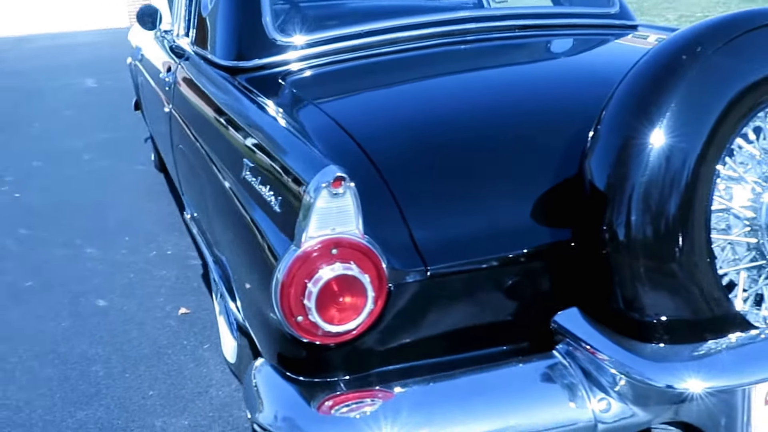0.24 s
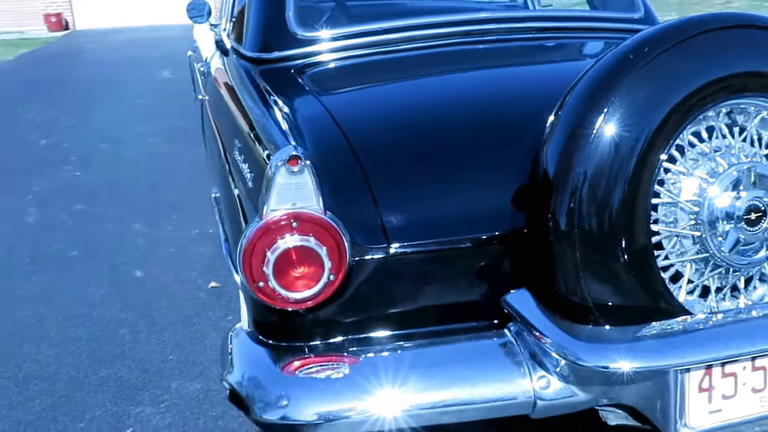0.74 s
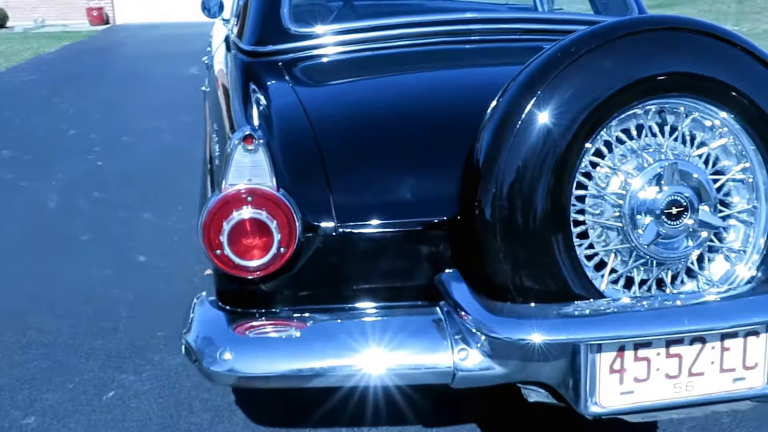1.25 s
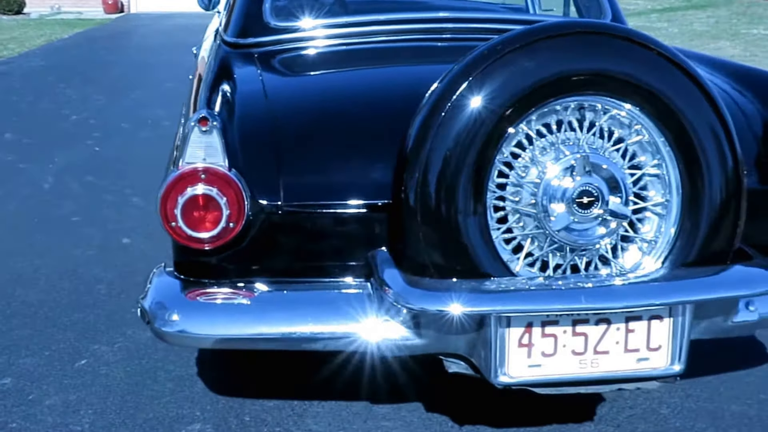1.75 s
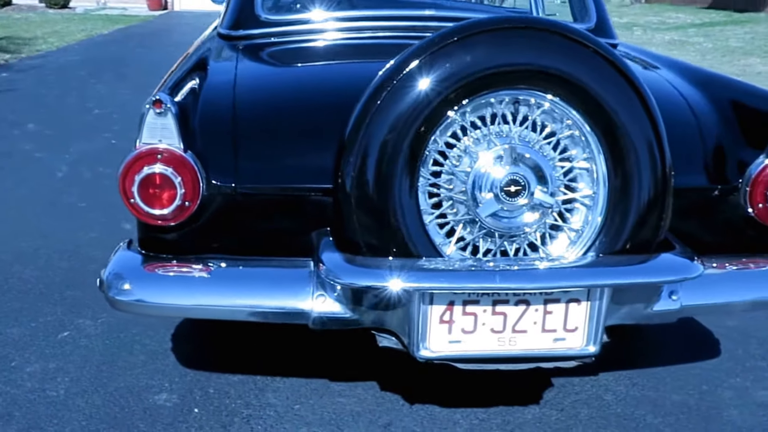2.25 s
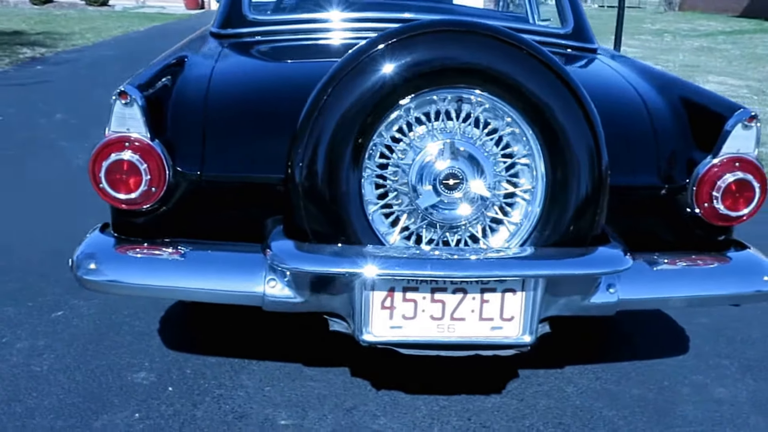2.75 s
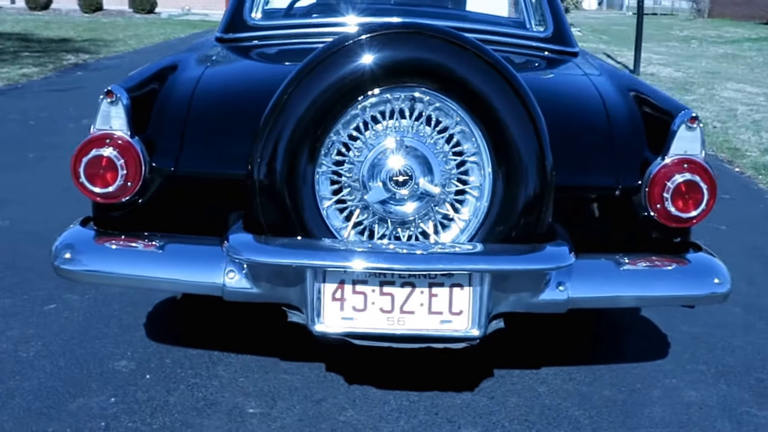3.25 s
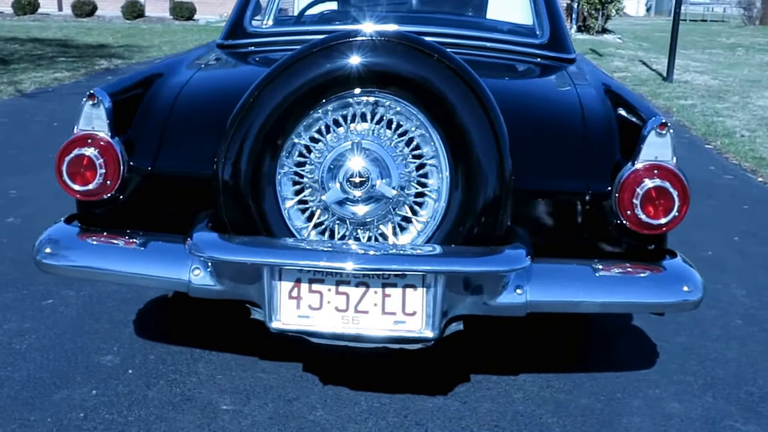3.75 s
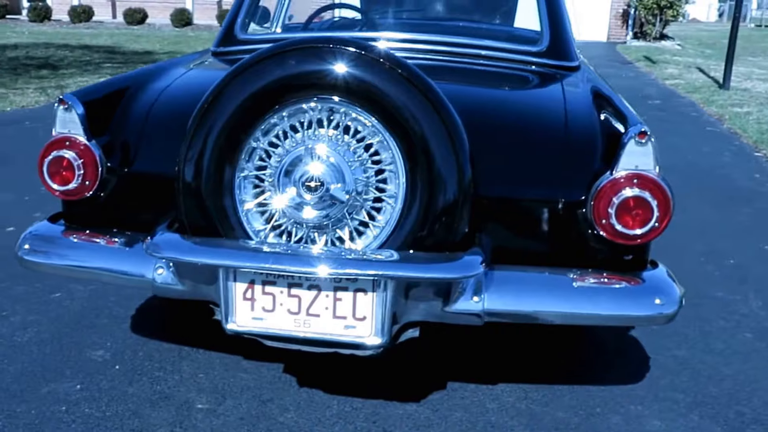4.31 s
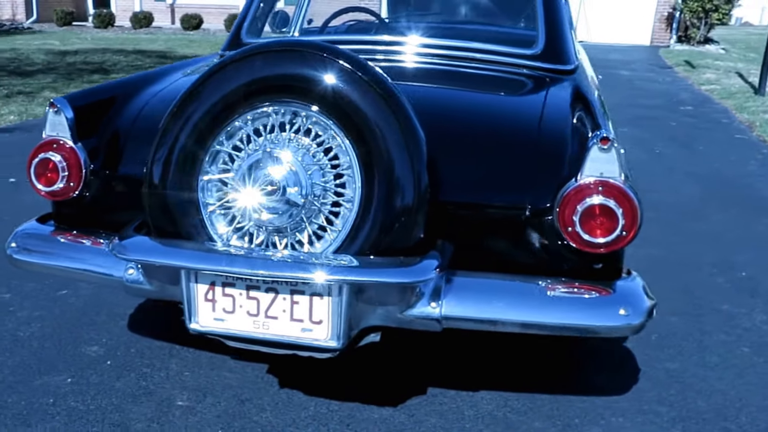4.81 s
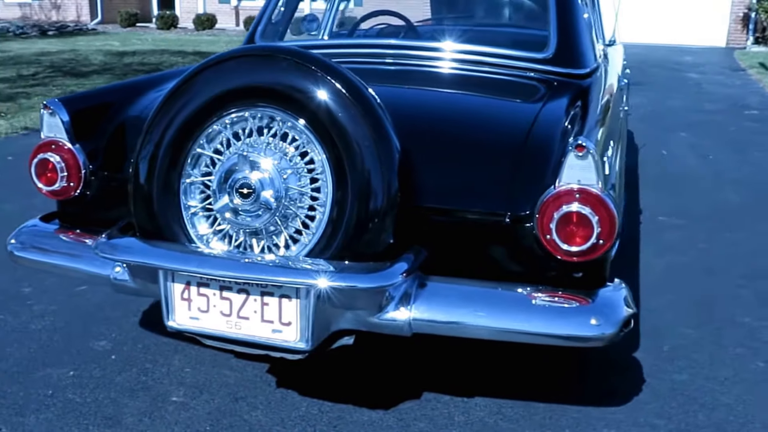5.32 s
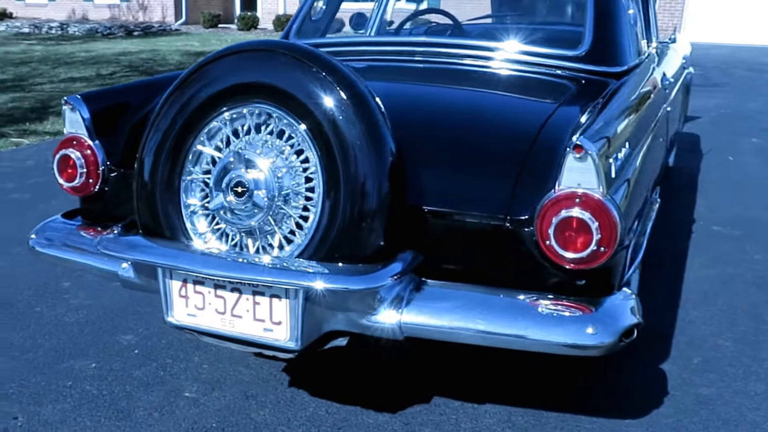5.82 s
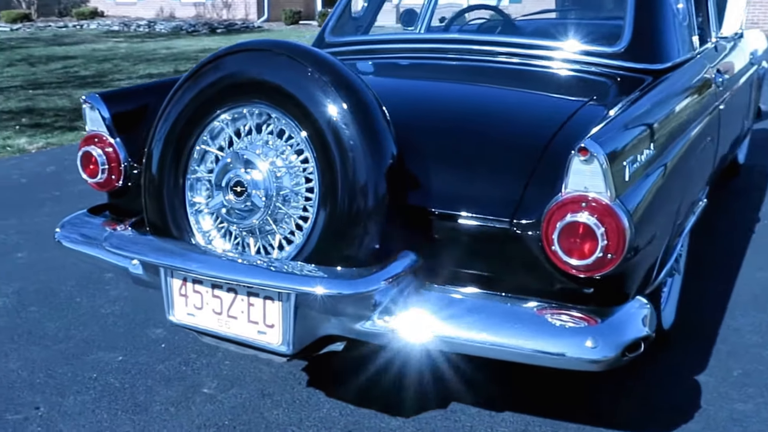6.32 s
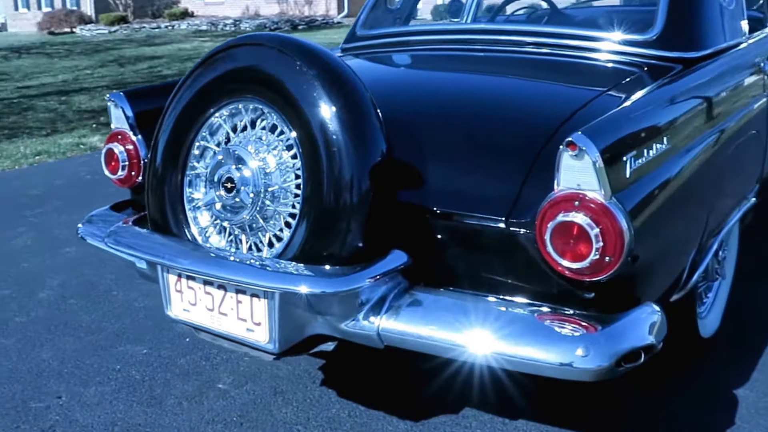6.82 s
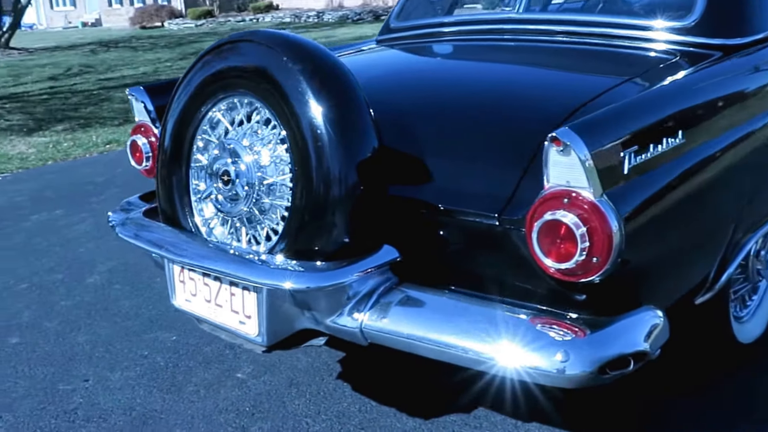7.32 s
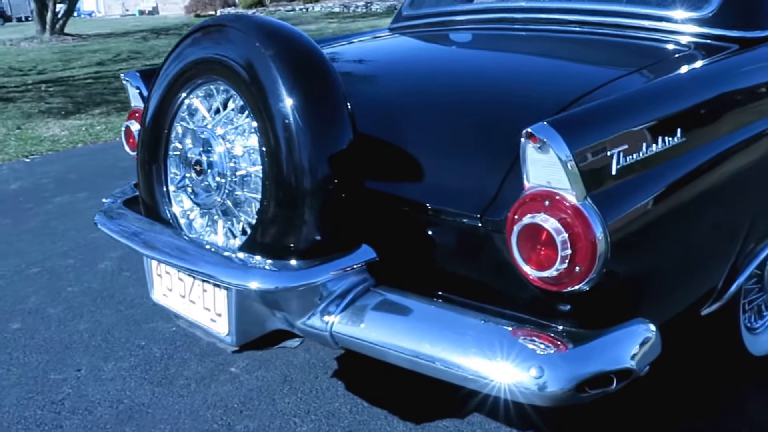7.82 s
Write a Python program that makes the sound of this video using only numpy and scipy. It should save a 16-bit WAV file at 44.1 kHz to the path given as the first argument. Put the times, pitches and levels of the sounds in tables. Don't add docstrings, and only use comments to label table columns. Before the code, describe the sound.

An old eight-cylinder car idles throughout at unchanged slow speed, about 68 firings a second, outdoors on asphalt, heard by a close handheld stereo camera. From 0 to 2 s the left pipe gives a deep uneven burble, with breathy fan roar, a faint high intake whistle and small valve ticks. Around 2.5 to 4.5 s, behind the middle, the burble smooths into an even low hum with an octave above it and thin belt whines. Soft wind flutters from 3.5 s, strengthening near 4.9 s into heavy bass buffets, strongest about 5.3 to 5.5 s. The automatic gain ducks and bass thins, recovering by about 6.4 s as gusts fade. From 6 to 8 s the right pipe burbles with a rough lope; the engine bay sounds closer, hissier and slightly louder, with scattered sharp metallic ticks. The idle continues to the end.

```python
import sys
import numpy as np
from scipy import signal
from scipy.fft import rfft, irfft, next_fast_len
from scipy.io import wavfile
from scipy.ndimage import uniform_filter1d, map_coordinates

SR = 44100
rng = np.random.default_rng(int(sys.argv[2]) if len(sys.argv) > 2 else 0)


def wav_record(signal):
    frames = np.transpose(np.atleast_2d(signal))
    bounded = np.clip(frames, -1, 1)
    quanta = np.round(bounded * 32767).astype(np.int16)
    wavfile.write(sys.argv[1], SR, quanta)


def undo_db(level):
    steps = np.asarray(level, float) / 20
    return 10 ** steps


N = 355446

# time in seconds, place on the arc (left corner -1, centre 0, right corner +1).
WALK = [(0, -0.76), (1.4, -0.68), (1.75, -0.42), (2.7, -0.35), (3.9, 0.2), (4.85, 0.38), (5.42, .4),
        (5.65, 0.74), (6.4, 0.8), (8.06, 0.79)]
# time in seconds, gain in dB.
CLOSE = [(0, 1), (.2, -1), (1.2, 1), (1.75, -0.5), (2.15, 1.5), (2.5, 0.5), (3.05, 2.5), (3.55, 2),
         (4.0, -1.5), (4.6, -1.5), (5.3, -2), (6.0, 0), (6.6, 3.5), (7.3, 4), (8.06, 4.5)]
# time in seconds, share of the side view from 0 to 1.
TURN = [(0, 0), (5.0, 0), (6.4, 1), (8.06, 1)]
# time in seconds, balance (left pipe +1, right pipe -1).
NEARER = [(0, .72), (2.9, .75), (3.4, .1), (4.6, -.05), (5.6, -.93), (6.5, -.81), (8.06, -.7)]
# time in seconds, left minus right in dB.
PAN = [(0, 0), (4.8, 0), (5.6, -.6), (6.3, -.5), (6.7, 0), (8.06, 0)]
# time in seconds, samples by which left lags right.
LAG = [(0, -0.9), (2.5, -.3), (4.8, 0.2), (5.6, .8), (6.5, 1.4), (8.06, 1.58)]
# frequency in Hz, side minus mid in dB.
WIDTH = [(60, -40.5), (290, -40), (630, -35), (1380, -14.5), (3030, -18), (6000, -6.5), (9000, -9.5),
         (14500, 2)]

# start in seconds, length in seconds, strength in dB.
GUSTS = [(1.18, 0.059, -46), (1.456, 0.083, -43), (1.68, 0.019, -34), (2.08, 0.17, -45), (2.62, .04, -45),
         (2.753, 0.03, -30.5), (2.8, .09, -36), (3.055, 0.2, -49), (3.549, 0.14, -32), (3.723, 0.14, -37),
         (3.915, 0.33, -29.5), (4.174, 0.022, -24), (4.308, 0.36, -29.5), (4.558, 0.085, -27),
         (4.69, .1, -35.5), (4.787, 0.066, -28), (4.879, 0.14, -20.5), (4.913, 0.0099, -20),
         (5.038, .012, -16), (5.065, 0.098, -22.5), (5.201, 0.029, -21), (5.238, 0.023, -23.5),
         (5.29, 0.025, -22), (5.333, 0.018, -17.5), (5.363, .02, -18), (5.391, .03, -15.5),
         (5.441, 0.02, -11), (5.465, .04, -18), (5.524, 0.16, -29), (5.779, 0.012, -24), (5.811, 0.08, -30),
         (5.977, 0.012, -22.5), (6.015, 0.205, -35), (6.141, .02, -30.5), (6.273, 0.027, -25.5),
         (6.313, 0.043, -35), (6.382, 0.053, -38.5), (6.45, 0.015, -30), (6.496, 0.099, -39),
         (6.732, 0.064, -39), (6.81, 0.057, -48), (6.919, 0.012, -25.5), (6.945, 0.046, -35),
         (7.054, 0.014, -31.5)]
GUST_RISE_S, GUST_FALL_S = 0.0081, 0.022
BREEZE_DB, BREEZE_GROWS_DB_PER_S, CALM_S = -54.5, 3.5, 3.6
# frequency in Hz, level in dB per Hz.
BUFFET = [(15, -44), (30, -30), (60, -16), (110, -5), (200, -1), (300, -5), (430, -7), (520, -15),
          (600, -22), (1000, -36), (2000, -70)]
# time in seconds, level above its rumble in dB.
FLUTTER = [(0, -9.5), (3.9, -15), (4.9, -10.5), (5.15, -6), (5.3, -2), (5.38, -6), (5.6, 3), (8.06, -1)]
# frequency in Hz, level against the opposed part in dB.
SHARED = [(100, 5), (250, 1), (430, -3), (600, -11)]

# frequency in Hz, level in dB per Hz.
FAN = [(650, -3), (1100, -8), (1560, -2), (1780, -2), (2050, -2), (2980, -3.5), (3920, -10), (4940, -12.5),
       (8000, -27.5), (10400, -53), (17600, -120)]
# frequency in Hz, level in dB per Hz.
BODY = [(160, 0.5), (270, -4.5), (295, -2), (403, -11), (498, 0), (723, -9.5), (933, -6.5), (1060, -11.5),
        (1400, -16.5), (1820, -75), (3080, -120)]
# frequency in Hz, level in dB per Hz.
HISS = [(3800, -31), (6500, -2), (8500, -5), (9700, -4), (10600, -9), (12100, -12), (13200, -10),
        (15000, -19)]
# frequency in Hz, width in Hz, level in dB.
PANELS = [(436, 1.7, -12), (500, 6, -18.5), (933, 72, -3), (1134, 4.9, -6.5), (1759, 35, 1.5)]
# frequency in Hz, width in Hz, level in dB.
FLANK = [(530.4, 7.5, 3), (994, 49, 2), (1818, 36, 2.5), (2290, 57, -20), (2960, 28, 2.5)]
ROAR_DB, BODY_DB, BODY_FLANK_DB, HISS_DB, HISS_FLANK_DB = -42, 12.5, -1, -17.5, 6.5
PATCHY_DB, FLANK_TOP_HZ = 1.7, 11000
DIRECT_DB = -9

# time in seconds, pitch in Hz, level in dB.
WHISTLE = [(0, 9070, -66), (.8, 9150, -68), (1.7, 9500, -78), (2.3, 9500, -76), (2.7, 9760, -71),
           (3.8, 9930, -65), (4.6, 9500, -69), (5.4, 9530, -78), (8.06, 9350, -77)]
WHISTLE_WIDTH_HZ = 180
# pitch in Hz, start in
# seconds, end in seconds, level in dB, left minus right in dB.
WHINES = [(323, 2.8, 4.7, -39, 0), (447, 1.9, 4, -42.5, 4), (488, -.3, 5, -40.5, 0), (235, 1.6, 3, -56, 18),
          (447, 1, 1.6, -49, 4), (914, 2, 2.9, -35.5, 0), (1144, .8, 3.6, -53, 0),
          (4470, 4.3, 5.7, -62, -2), (403, 3.2, 4.7, -45, 0), (406, .2, 1.2, -47, 0),
          (327, .2, 1.6, -46, 0), (914, 1.5, 2.1, -46, 0), (5700, 4.3, 6.3, -65, 0)]
# pitch in Hz, 60 dB decay in seconds, place in the engine cycle from 0 to 1,
# start in seconds, end in seconds, level in dB.
TAPPETS = [(13050, .015, .36, 0, 5.8, -55), (5750, .04, .04, 2.8, 7.2, -53),
           (4850, .04, .59, 7.3, 8.1, -50), (2950, .025, .85, 6.8, 6.7, -44),
           (4600, .03, .55, 2.5, 8.1, -58), (2900, .02, .7, 0, 5, -50), (2900, .02, .35, 5, 8.1, -48),
           (9700, .01, .55, .5, 5, -62), (7500, .01, .02, 0, 8.1, -61)]
# time in seconds, pitch in Hz, 60 dB decay in seconds, level in dB.
TICKS = [(4.91, 90, .06, -11), (5.292, 110, 0.079, -13), (5.372, 85, .09, -9.5), (5.435, 100, .07, -11),
         (6.285, 140, .06, -10), (2.745, 940, .03, -29), (5.733, 5800, .04, -50), (5.85, 5700, .04, -51),
         (5.968, 5800, .04, -44), (6.015, 4800, .04, -47), (6.832, 3300, .03, -36), (6.74, 2880, .03, -45),
         (6.91, 2940, .03, -36), (7.424, 1820, .05, -35), (7.763, 5000, .04, -39),
         (7.775, 3300, 0.027, -42), (7.881, 4900, .04, -39.5)]

# time in seconds, firings per second in Hz.
SPEED = [(0.0, 68.69), (0.75, 68.53), (1.22, 69.39), (1.75, 68.28), (2.5, 68.2), (2.88, 69.62),
         (3.3, 68.65), (4.2, 67.94), (4.5, 68.44), (5.25, 68.29), (5.5, 67.68), (5.8, 68.55), (6.3, 67.9),
         (6.88, 69.19), (7.5, 68.46), (8.06, 69.14)]
BANKS = [1, 1, -1, 1, -1, -1, 1, -1]
CYLINDERS = [-.2, .15, .45, -.1, -.5, -.1, .3, .15]
# frequency in Hz, level in dB.
LEFT_PIPE = [(15, -45), (30, -27), (43, -9), (60, -2), (77, -5), (94, 2), (112, -1), (129, 0), (146, -8),
             (154, -16), (163, -7), (185, -19), (230, -50)]
# frequency in Hz, level in dB.
MIDDLE_PIPE = [(15, -45), (30, -29), (43, -14), (60, 0), (77, -5), (86, 0), (94, -3), (112, -2), (120, 2),
               (129, -1), (146, -7), (154, -13), (163, -6), (185, -19), (230, -50)]
# frequency in Hz, level in dB.
RIGHT_PIPE = [(15, -50), (30, -30), (43, -14), (60, -8), (77, -9), (94, 2), (112, -7), (129, -1), (146, -9),
              (165, -15), (185, -18), (230, -50)]
# frequency in Hz, level in dB.
RASP = [(140, -6.5), (154, -12.5), (165, -7), (180, -1), (191, -9), (205, -0.5), (220, 3), (236, 10.5),
        (254, 2.5), (285, -22.5), (400, -8.5), (700, -64)]
TONE_DB, TONE_LEFT_DB, TONE_FLANK_DB = -15.5, -1.5, -3.5
PIPES_FOLLOW, RASP_FOLLOWS = 0.23, 0.17
OCTAVE_DB, OCTAVE_OFF_DB, OCTAVE_BEAM = -19, -23, 2.57
THIRD_DB, THIRD_OFF_DB = -37.5, -8.5
BURBLE_DB, BURBLE_LEFT_DB, BURBLE_RIGHT_DB = -28.5, 11.5, 11
BURBLE_BEAM = 1.78
RASP_DB, RASP_LEFT_DB, RASP_RIGHT_DB = -27, -1.5, -3
RASP_LEAD_S = .0012
ALTERNATE, ALTERNATE_LATE_S = 0.26, .00125
MISFIRE, FLANK_ROUGH = .3, .5
LOPE, LOPE_TURN = .31, 2.64
PAIRS, SEESAW = .4, .2

# time in seconds, depth in dB, recovery in seconds.
DUCKS = [(2.2, 1.5, 0.44), (2.77, 2, 0.3), (3.11, 2.5, 0.28), (4.92, 4.5, 0.33), (5.416, 6, 0.94)]
DUCK_S = 0.009
CUT_ON_S, CUT_OFF_S, CUT_EDGE_S, CUT_HZ, CUT_DB, CUT_END_DB = 5.45, 6.36, .05, 125, -12, -5
WIND_CUT_HZ = 130
CEILING, SUBSONIC_HZ = .83, 18


def unit(x):
    return x / np.sqrt(np.mean(x ** 2) + 1e-20)


def along(points, hz):
    f, v = np.transpose(points)
    return np.interp(np.log(hz + 1), np.log(f + 1), v)


def curves(rows):
    s, *cols = np.transpose(rows)
    return [np.interp(np.arange(N) / SR, s, c) for c in cols]


def wobble(rate):
    knots = rng.standard_normal(int(N * rate / SR) + 4)
    return map_coordinates(knots, [np.arange(N) * rate / SR])


def filtered(x, response):
    m = next_fast_len(N + SR // 2)
    return irfft(rfft(x, m) * response(np.fft.rfftfreq(m, 1 / SR)), m)[..., :N]


def band(lo_hz, hi_hz):
    return lambda hz: 1 / (1 + (hz / hi_hz) ** 20) / (1 + (lo_hz / (hz + 1)) ** 20)


def low_pass(corner_hz, order):
    return lambda hz: 1 / (1 + (hz / corner_hz) ** order)


def early(hz, s):
    return np.exp(2j * np.pi * hz * s)


def causal(points, lead_s):
    def response(hz):
        cepstrum = irfft(np.log(undo_db(along(points, hz))))
        cepstrum[1:len(hz) - 1] *= 2
        cepstrum[len(hz):] = 0
        return np.exp(rfft(cepstrum)) * early(hz, lead_s)
    return response


def bumps(modes, hz):
    return 1 + sum(undo_db(db) / (1 + (2 * (hz - c) / w) ** 2) for c, w, db in modes)


def noise(spectrum):
    def shape(hz):
        return undo_db(along(spectrum, hz)) * [hz ** 0, undo_db(along(WIDTH, hz))]
    mid, side = filtered(rng.standard_normal((2, N)), shape)
    return np.array([mid + side, mid - side]) / np.std(mid)


def fade(t0, t1):
    t = np.arange(N) / SR
    return np.clip((t - t0) / 0.22, 0, 1) * np.clip((t1 - t) / 0.35, 0, 1)


def ring(hz, t60, rise_s, jitter):
    t = np.arange(SR // 20) / SR
    phase = 2 * np.pi * hz * t + jitter * rng.standard_normal(len(t)).cumsum()
    return undo_db(-60 * t / t60) * (1 - np.exp(-t / rise_s)) * np.sin(phase)


def by_corner(left_db, right_db, beam=1):
    place, = curves(WALK)
    return left_db * np.clip(-place, 0, None) ** beam + right_db * np.clip(place, 0, None) ** beam


def gusting():
    t = np.arange(N) / SR
    power = undo_db(BREEZE_DB + BREEZE_GROWS_DB_PER_S * t) ** 2 * (t < CALM_S)
    for s, length, db in GUSTS:
        rise = np.clip(1 + (t - s) / GUST_RISE_S, 0, 1)
        fall = np.clip(1 + (s + length - t) / GUST_FALL_S, 0, 1)
        power += (undo_db(db) * rise * fall) ** 2
    return np.sqrt(power)


def wind():
    lumps = undo_db(3 * wobble(45) + 2.5 * np.array([wobble(40), wobble(40)]))
    push = filtered(rng.standard_normal((2, N)), lambda hz: undo_db(along(BUFFET, hz)))
    rumble = filtered(push, low_pass(230, 4))
    push = rumble + undo_db(curves(FLUTTER)[0]) * (push - rumble)
    steady = np.sqrt(np.abs(uniform_filter1d((rumble ** 2).mean(0), size=SR // 24)))
    push = gusting() * unit(lumps) * push / steady
    push -= filtered(push.mean(0), lambda hz: 1 - undo_db(along(SHARED, hz)))
    tripped = np.clip((np.arange(N) / SR - CUT_ON_S) / CUT_EDGE_S, 0, 1)
    return push - tripped * filtered(push, low_pass(WIND_CUT_HZ, 3))


def patchy(x, depth_db):
    z = signal.stft(x, nperseg=1024)[2]
    field = uniform_filter1d(rng.standard_normal(z.shape[1:]), size=3, axis=0)
    field = uniform_filter1d(field, size=30, axis=1)
    short = np.clip(np.arange(len(field)) * SR / 1024 / 2000, 0, 1)[:, None]
    return signal.istft(z * undo_db(depth_db * unit(field) * short), nperseg=1024)[1][:, :N]


def engine_bay(fired):
    flank, = curves(TURN)
    roar_db = ROAR_DB + curves(CLOSE)[0]
    body_db = BODY_DB + BODY_FLANK_DB * flank
    hiss_db = HISS_DB + HISS_FLANK_DB * flank
    cycle = 2 * np.pi * (fired / len(BANKS) - .65)
    beat = 0.4 * np.cos(cycle) + 0.84 * np.cos(2 * cycle)
    beat += 0.46 * np.cos(4 * cycle) + 0.52 * np.cos(8 * cycle)
    raw = undo_db(body_db) * noise(BODY) * undo_db(0.47 * wobble(20))
    raw += undo_db(2.5 + beat + 0.63 * wobble(14)) * noise(FAN)
    rear = filtered(raw, lambda hz: bumps(PANELS, hz))
    side = filtered(raw, lambda hz: bumps(FLANK, hz))
    hiss = undo_db(hiss_db + 0.5 + beat + 0.85 * wobble(11)) * noise(HISS)
    scattered = hiss - hiss.mean(0)
    hiss -= flank * (scattered - filtered(scattered, low_pass(FLANK_TOP_HZ, 12)))
    return undo_db(roar_db - 1.5) * patchy((1 - flank) * rear + flank * side + hiss, PATCHY_DB)


def whistle():
    hz, db = curves(WHISTLE)
    a, b = filtered(rng.standard_normal((2, N)), low_pass(WHISTLE_WIDTH_HZ, 2))
    turn = 2 * np.pi * np.cumsum(hz) / SR
    return undo_db(db - 5 + 3 * wobble(15)) * unit(a * np.cos(turn) + b * np.sin(turn))


def whines():
    t = np.arange(N) / SR
    out = np.zeros((2, N))
    for hz, t0, t1, db, pan in WHINES:
        tone = undo_db(1.2 * wobble(9)) * np.sin(2 * np.pi * hz * t + .4 * wobble(7))
        out += undo_db(db + 1.0 + np.array([[pan], [-pan]]) / 2) * fade(t0, t1) * tone
    return out


def tappets(fired):
    out = np.zeros(N)
    for hz, t60, place, t0, t1, db in TAPPETS:
        at = np.flatnonzero(np.diff(np.floor(fired / len(BANKS) - place)))
        blows = np.zeros(N)
        blows[at] = undo_db(db + 2.6 * rng.standard_normal(len(at)))
        tick = ring(hz, t60, 0.0003, 0.094)
        out += signal.fftconvolve(blows, tick)[:N] * fade(t0 - .3, t1 + 0.4)
    return out * undo_db(curves(CLOSE)[0] + 4)


def knocks():
    out = np.zeros(N + SR)
    for s, hz, t60, db in TICKS:
        out[round(s * SR):][:SR // 20] += undo_db(db) * ring(hz, t60, .001, hz / 60000)
    return out[:N]


def pipe_levels():
    close_db, = curves(CLOSE)
    tone_db = TONE_DB + by_corner(TONE_LEFT_DB, 0) + TONE_FLANK_DB * curves(TURN)[0]
    octave_db = OCTAVE_DB + OCTAVE_OFF_DB * np.abs(curves(WALK)[0]) ** OCTAVE_BEAM
    burble_db = BURBLE_DB + by_corner(BURBLE_LEFT_DB, BURBLE_RIGHT_DB, BURBLE_BEAM)
    rasp_db = RASP_DB + RASP_FOLLOWS * close_db + by_corner(RASP_LEFT_DB, RASP_RIGHT_DB)
    return PIPES_FOLLOW * close_db + [tone_db, octave_db, burble_db, rasp_db]


def firings(fired):
    at = np.flatnonzero(np.diff(np.floor(fired))) + 1
    slot = np.floor(fired[at]).astype(int) % len(BANKS)
    flank, place, nearer = [curves(rows)[0][at] for rows in (TURN, WALK, NEARER)]
    luck = rng.standard_normal((len(at), 3))
    even, sharp, odd, rough = np.zeros((4, N))
    even[at] = undo_db(2.3 * luck[:, 0])
    sharp[at] = undo_db(0.64 * luck[:, 0] + 1.26 * luck[:, 2])
    uneven = nearer * np.take(BANKS, slot) + np.take(CYLINDERS, slot)
    uneven += LOPE * flank * np.cos(2 * np.pi * slot / len(BANKS) + LOPE_TURN)
    uneven += MISFIRE * (1 + flank / 2) * luck[:, 1]
    centre = np.clip((place + .4) / .5, 0, 1) * (1 - flank)
    uneven += SEESAW * flank * (-1) ** slot - PAIRS * centre * np.cos(np.pi * slot / 2)
    odd[at] = uneven
    rough[at] = uneven + FLANK_ROUGH * flank * luck[:, 2] + 0.63 * sharp[at]
    late = np.minimum(at + round(ALTERNATE_LATE_S * SR), N - 1)
    rough[late] = ALTERNATE * (-1) ** slot
    return even, sharp, odd, rough


def exhaust(fired):
    tone_db, octave_db, burble_db, rasp_db = pipe_levels()
    third_db = THIRD_DB + by_corner(THIRD_OFF_DB, 0)
    flank, = curves(TURN)
    even, sharp, odd, rough = firings(fired)
    pipes = (LEFT_PIPE, MIDDLE_PIPE, RIGHT_PIPE)
    left, middle, right = [unit(filtered(odd, causal(p, .0033))) for p in pipes]
    corner = np.clip((-curves(WALK)[0] - .4) / .28, 0, 1)
    left = corner * left + (1 - corner) * middle
    octave = filtered(sharp, lambda hz: band(126, 160)(hz) * early(hz, -.0013))
    third = filtered(sharp, lambda hz: band(198, 213)(hz) * early(hz, RASP_LEAD_S))
    out = undo_db(tone_db) * unit(filtered(even, band(42, 113)))
    out += undo_db(octave_db) * unit(octave)
    out += undo_db(burble_db + 4.5) * ((1 - flank) * left + flank * right)
    out += undo_db(rasp_db) * unit(filtered(rough, causal(RASP, RASP_LEAD_S)))
    out += undo_db(third_db) * unit(third)
    return filtered(out, lambda hz: low_pass(600, 8)(hz) / (1 + (16 / (hz + 1)) ** 4))


def at_ports(car):
    flank, = curves(TURN)
    car = car.mean(0) + (car - car.mean(0)) * undo_db(DIRECT_DB * flank)
    half = curves(LAG)[0] / 2
    heard = np.array([map_coordinates(c, [np.arange(N) - k * half], mode="nearest")
                      for c, k in zip(car, (1, -1))])
    apart = (heard[0] - heard[1]) / 2
    heard -= flank * filtered(apart, low_pass(650, 6)) * [[1], [-1]]
    return heard * undo_db(curves(PAN)[0] * [[.5], [-.5]])


def scene():
    fired = np.cumsum(curves(SPEED)[0]) / SR
    car = engine_bay(fired) + tappets(fired) + whines() + whistle() + knocks()
    return at_ports(car) + exhaust(fired - .38) + wind()


def gain_control(x):
    t = np.arange(N) / SR
    duck_db = np.zeros(N)
    for s, db, back in DUCKS:
        duck_db += db * np.clip((t - s) / DUCK_S, 0, 1) * np.clip(1 - (t - s) / back, 0, 1)
    on = np.clip((t - CUT_ON_S) / CUT_EDGE_S, 0, 1)
    cut_db = on * np.interp(t, [CUT_ON_S, CUT_OFF_S], [CUT_DB, CUT_END_DB])
    bass = filtered(x, low_pass(CUT_HZ, 4))
    return undo_db(-duck_db) * (x - (1 - undo_db(cut_db)) * bass)


def roll_off(x):
    return signal.sosfilt(signal.butter(12, 15120, fs=SR, output="sos"), x)


def record(dry):
    dry = gain_control(filtered(dry, lambda hz: 1 / (1 + (SUBSONIC_HZ / (hz + 1)) ** 4)))
    mix = dry / (1 + np.abs(dry / CEILING) ** 6) ** (1 / 6)
    return roll_off(mix)


dry = scene()
out = record(dry)
wav_record(out)
```